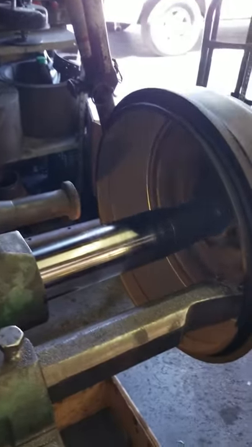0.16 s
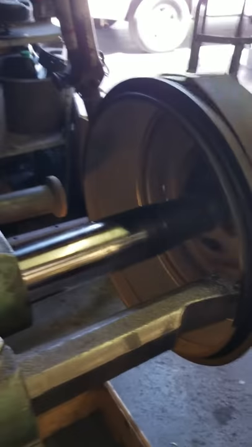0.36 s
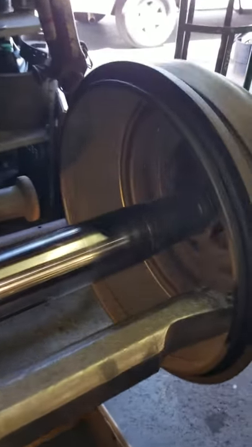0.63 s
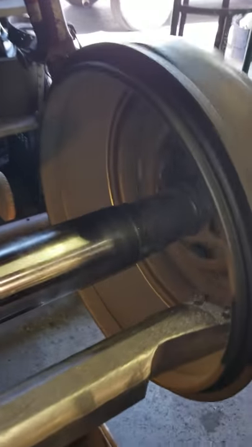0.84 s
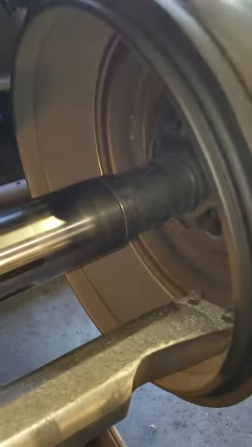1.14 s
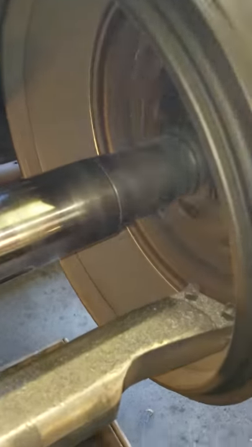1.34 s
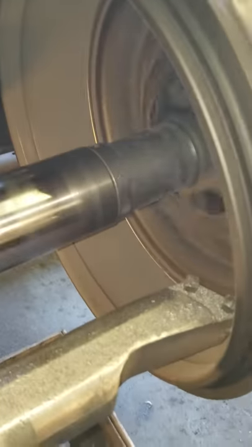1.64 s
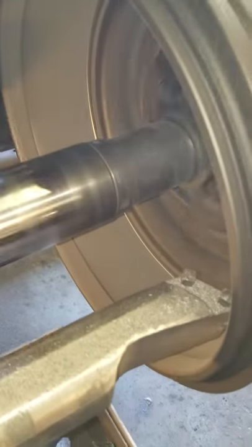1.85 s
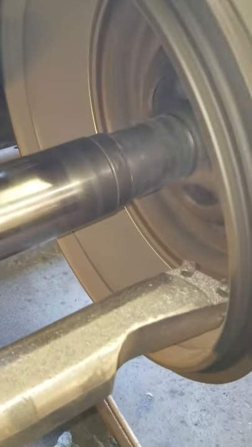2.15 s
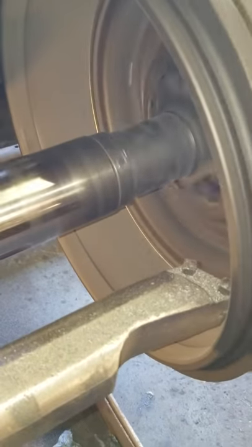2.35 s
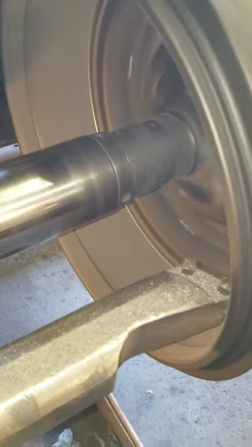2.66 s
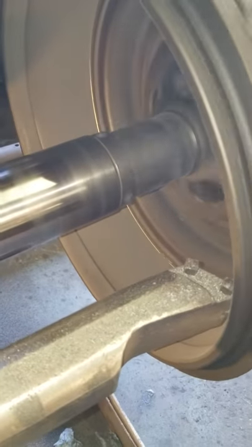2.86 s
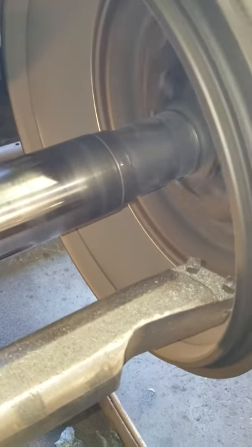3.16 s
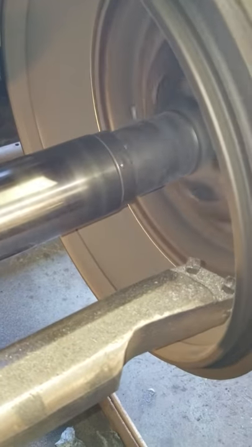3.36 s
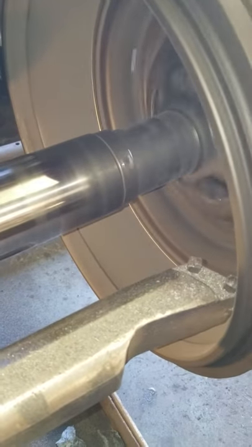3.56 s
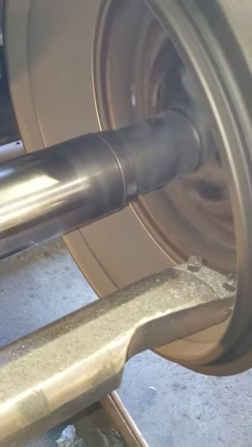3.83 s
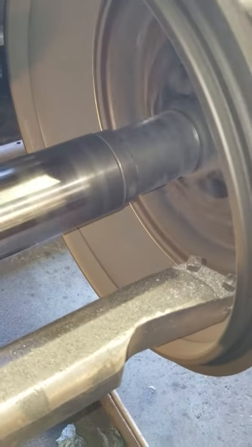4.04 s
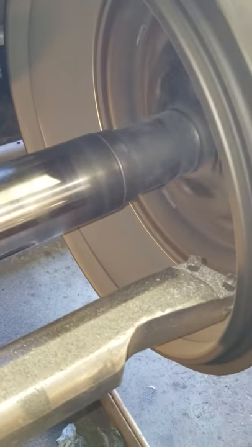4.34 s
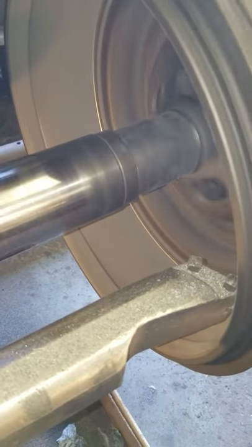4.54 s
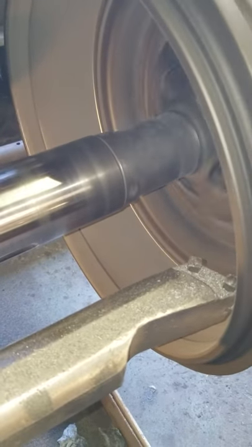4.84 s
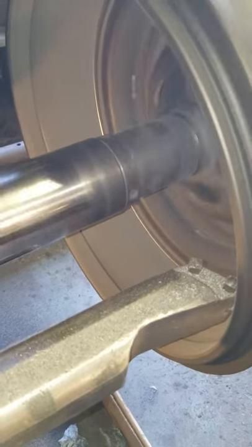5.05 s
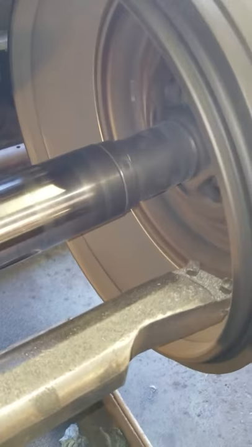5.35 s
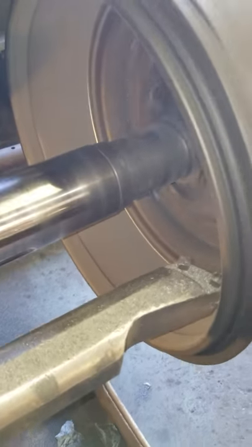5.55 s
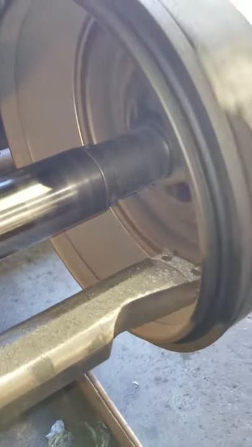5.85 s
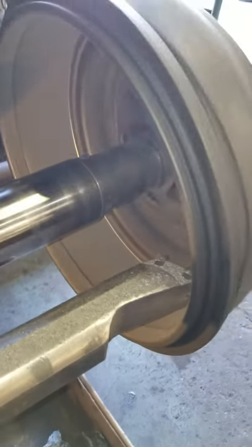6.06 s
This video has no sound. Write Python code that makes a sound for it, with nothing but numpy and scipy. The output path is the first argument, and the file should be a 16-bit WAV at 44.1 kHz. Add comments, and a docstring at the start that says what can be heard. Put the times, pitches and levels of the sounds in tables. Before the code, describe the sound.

Steady metal cutting in a workshop: piercing, fluttering squeal and bright scraping shimmer, brief early rim clangs, and a low machine drone underneath.

```python
"""A harsh metallic shimmer and a high, surging squeal ride over a low hum and rumble: a brake lathe turns a drum.
The hand-held microphone moves in close to the boring bar, then lifts away, which shifts levels and stereo.
Random chip impulses strike resonant modes of drum, bar, tip and clamp; swells make flares and clangs.
Motor tones, a drone, noise bands and randomly shaken resonances form the machine.
The cut alone gets a sliding reflection and scattered workshop echoes; the mix is low-passed."""
import sys
import numpy as np
from scipy import signal
from scipy.io import wavfile
from scipy.ndimage import uniform_filter1d

SR = 44100
rng = np.random.default_rng(int(sys.argv[2]) if len(sys.argv) > 2 else 0)


def unload_wav(signal):
    """Save mono or channel-first audio to the path in sys.argv[1] as 16-bit WAV at rate SR, clipped to [-1, 1]."""
    wavfile.write(
        sys.argv[1],
        SR,
        np.round(np.clip(np.atleast_2d(signal).T, -1, 1) * 32767).astype(np.int16),
    )


N = 273420  # samples, 6.2 s

PORT_COHERENCE = 0.85  # share of a mode's amplitude that both microphone ports hear alike, apart from phase
TURN_HZ = 1.655  # turns of the drum per second


def from_db(db):
    """Decibels become an amplitude factor."""
    return np.exp(np.asarray(db) * (np.log(10) / 20))


def rms_one(x):
    """Scales a signal to rms 1."""
    return x / np.sqrt(np.mean(x ** 2) + 1e-20)


def centre_one(pair):
    """Scales a stereo pair so that its centre has rms 1."""
    return pair / np.sqrt(np.mean(pair.mean(axis=0) ** 2))


def in_time(rows):
    """Draws one curve per column by joining the rows with straight lines."""
    seconds, *columns = np.transpose(rows)
    return [np.interp(np.arange(N) / SR, seconds, column) for column in columns]


def at_hz(points, hz):
    """Reads a spectrum on a log-frequency axis."""
    f, value = np.transpose(points)
    return np.interp(np.log(hz), np.log(f), value)


def drift(rate, size=1):
    """Noise through a two-pole low-pass near rate Hz: smooth chance of rms 1, read at every size-th sample."""
    step = 40  # samples between the drawn points
    pole = np.exp(-2 * np.pi * rate * step / SR)
    noise = rng.standard_normal(N // step + 2002)
    slow = signal.lfilter([1], [1, -2 * pole, pole * pole], noise)[2000:]  # drops the filter's start
    return np.interp(np.arange(0, N, size) / step, np.arange(len(slow)), rms_one(slow))


def swells(rows):
    """Each (crest s, length s, rise dB) row lifts the level in a smooth bell; in dB."""
    out = np.zeros(N)
    for crest_s, length_s, rise_db in rows:
        start = max(int((crest_s - length_s / 2) * SR), 0)
        stop = min(int((crest_s + length_s / 2) * SR), N)
        now = np.arange(start, stop)
        out[now] += rise_db * np.cos(np.pi * (now / SR - crest_s) / length_s) ** 2
    return out


def wavering(pair, share, rate):
    """Bends the pitch at random, by an rms share of it, by reading faster and slower."""
    now, bend = np.arange(N), drift(rate)
    read = now + np.cumsum(share * (bend - bend.mean()))
    return np.array([np.interp(read, now, channel) for channel in pair])


def sustained(pair, hold_s):
    """A steadily driven vibration keeps its size over hold_s and only flutters faster than that."""
    size = int(hold_s * SR)
    power = uniform_filter1d(uniform_filter1d(np.mean(pair ** 2, axis=0), size), size)
    return pair * np.sqrt(np.mean(power) / (power + 1e-12))


def place(pair, pan_db, likeness):
    """Two unrelated signals become left and right with a given balance and likeness."""
    alike = np.clip(likeness, -.99, .99)
    mid = np.sqrt((1 + alike) / 2) * pair[0]
    side = np.sqrt((1 - alike) / 2) * pair[1]
    lean = from_db(pan_db / 2)
    return np.array([(mid + side) * lean, (mid - side) / lean])


def resonate(force, hz, width_hz):
    """Two equal band-pass sections in series ring at one pitch, already sounding at the start; rms 1."""
    r = np.exp(-np.pi * width_hz / SR)
    section = [1 - r, 0, r - 1, 1, -2 * r * np.cos(2 * np.pi * hz / SR), r * r]
    run_in = SR // 20
    led_in = np.hstack([force[:, -run_in:], force]) + 1e-18
    out = signal.sosfilt(np.float32([section, section]), led_in)[:, run_in:]
    return [rms_one(channel) for channel in out]


def microphone_position():
    """The microphone's path as two curves, further back and above; both are near 0 close to the bar."""
    # hand-held path: t/s, further back (0..1), above (0..1)
    path = [(0, 0.93, 0.1), (.5, 0.9, 0.17), (.9, 0.33, 0.25), (1.3, 0.013, 0.018), (5.3, 0.022, 0.018),
            (5.65, 0.29, 0.91), (6.2, 0.28, 0.87)]
    return in_time(path)


def heard(close_db, back_db, above_db):
    """A part's level in dB follows the microphone: its level at the bar plus a change for each direction."""
    back, above = microphone_position()
    return close_db + back * back_db + above * above_db


def beam_db(hz):
    """How much a mode gains while the microphone crosses beams that neighbouring modes radiate."""
    # beams: lowest f/Hz, highest f/Hz, crest t/s, length t/s, rise/dB
    beams = [(9390, 10400, 1.01, 0.6, 6), (9400, 9700, .3, 0.32, 3), (10900, 14000, 1.22, .5, 1),
             (11900, 12100, 1.34, 0.73, 12.5), (12400, 12300, 0.12, .2, 3), (12200, 12700, .58, 0.42, 11),
             (13500, 13750, 1.28, .35, 3), (14100, 16000, 1.13, .4, 4), (5250, 5550, 1.1, 1.5, 6),
             (5850, 6800, 1.44, 0.93, 4), (2300, 2500, 0.38, 0.38, 3), (2800, 4500, 0.83, 0.33, 3),
             (2800, 2950, 0.76, 1.2, 3), (5830, 6100, 5.27, 0.47, 6), (10930, 11300, 5.35, 0.76, 3)]
    return swells([swell for low_hz, high_hz, *swell in beams if low_hz < hz < high_hz])


def from_ports(force, hz, width_hz, pan_db, phase):
    """One mode reaches the two microphone ports with a phase shift, plus a diffuse part."""
    kicks = force * (rng.random((2, N), dtype=np.float32) - .5)  # random sign and strength
    direct, diffuse = resonate(kicks, hz, width_hz)
    quadrature = rms_one(np.gradient(direct))  # a quarter cycle away
    lean = from_db(pan_db / 2)
    in_step = np.float32(PORT_COHERENCE * np.cos(phase) / lean)
    shifted = np.float32(PORT_COHERENCE * np.sin(phase) / lean)
    scattered = np.float32(np.sqrt(1 - PORT_COHERENCE ** 2) / lean)
    left = np.float32(lean) * direct
    right = in_step * direct - shifted * quadrature + scattered * diffuse
    return left, right


def body(modes, force, swell_db, swell_rate, pan_db=0, added_phase=0):
    """Impulses ring every mode; the blend drifts and follows the microphone, at centre rms about 1 before beams."""
    size = 16  # samples per step of the slow gains
    back, above = (curve[::size] for curve in microphone_position())
    sway = np.broadcast_to(added_phase, N)[::size]
    force = np.float32(force)
    out, centre_power = np.zeros((2, N), np.float32), 0
    for hz, width_hz, level_db, lean_db, phase, back_db, above_db in modes:
        mode_db = level_db + back * back_db + above * above_db
        gain = from_db(mode_db + swell_db * drift(swell_rate, size=size))
        beamed = np.repeat(np.float32(gain * from_db(beam_db(hz)[::size])), size)[:N]
        ports = from_ports(force, hz, width_hz, lean_db + pan_db, phase + added_phase)
        for ear, sound in zip(out, ports):
            ear += beamed * sound
        centre_power += gain ** 2 * (1 + PORT_COHERENCE * np.cos(phase + sway)) / 2
    return out / np.repeat(np.sqrt(centre_power), size)[:N]


def chips(per_s, spread_db):
    """Chips snap off at random moments; a positive spread makes a few much stronger, a negative one weaker."""
    sizes = from_db(spread_db * np.minimum(rng.exponential(1, N), 4))
    return sizes * (rng.random(N) < per_s / SR)


def cutting_load(uneven_db, uneven_rate, gear_hz, gear_db):
    """The pressure on the bit varies with the drum's surface and ripples with the gear teeth."""
    gear_speed = gear_hz * (1 + 0.045 * drift(1.3))
    teeth = np.sin(2 * np.pi * np.cumsum(gear_speed) / SR)
    return from_db(uneven_db * drift(uneven_rate) + gear_db * teeth)


def turning(per_turn, crest_s):
    """A wave of height 1 that passes the bit per_turn times in each turn of the drum."""
    return np.cos(2 * np.pi * per_turn * TURN_HZ * (np.arange(N) / SR - crest_s))


def clangs():
    """Coarse chips make the rim clang: its level jumps up and dies away; in dB."""
    # clangs: crest t/s, rise/dB
    strikes = [(.297, 8.5), (0.7, 17.5), (.849, 16.5), (.949, 8), (1.04, 11), (1.174, 8), (1.32, 3.5),
               (1.438, 9), (2.654, 3), (2.791, 6), (3.263, 7.5), (3.588, 4), (3.975, 2), (4.577, 4.5),
               (4.992, 7), (5.178, 6.5), (5.276, 7)]
    attack_s, decay_s = 0.023, 0.016
    t, out = np.arange(N) / SR, np.zeros(N)
    for crest_s, rise_db in strikes:
        since = t - crest_s
        fall = np.where(since < 0, (since / attack_s) ** 2, since / decay_s)
        out += rise_db * np.exp(-np.minimum(fall, 20))
    return out


def drum_rim(load):
    """Chips ring the rim's close modes; a wavy surface makes it throb and the bit's contact bends its pitch."""
    # rim modes: f/Hz, section width/Hz, relative level/dB, left-right/dB, left-right phase/rad,
    # change further back/dB, change above/dB
    rim_modes = [(1584, 34, -35.5, 5, -1.1, 8.5, -3), (1640.6, 63, -35.5, -2.5, -0.91, -5, -5),
                 (1661.7, 27, -37, 4.5, 0.96, 4, -0.5)]
    throb_db = 0.96 * sum(turning(waves, crest_s=0.11) for waves in (4, 5))
    level_db = heard(close_db=-34.5, back_db=-2.7, above_db=-0.75) + throb_db + clangs()
    ringing = body(rim_modes, load * chips(per_s=900, spread_db=3.0), swell_db=0.0, swell_rate=12)
    return from_db(level_db) * wavering(sustained(ringing, hold_s=0.089), share=0.00835, rate=34.6)


def drum_wall():
    """Fine chips keep the wall shimmering; out of round, it rings louder where the cut deepens once a turn."""
    # wall modes: f/Hz, section width/Hz, relative level/dB, left-right/dB, left-right phase/rad,
    # change further back/dB, change above/dB
    wall_modes = [(2147, 280, -45, -1.5, 1.5, 5, -4.5), (2355, 144, -43.5, 2.5, 0.8, 3.5, -2),
                  (2450, 79, -44, 0.5, 2, 7, 8), (2624, 96, -49, -8, 0.5, 6, 5),
                  (2894.6, 101, -31, 5, -2, -1, -1.5), (3015, 390, -33.5, 1, -2.5, 0, 2),
                  (3220, 120, -39, 1, 2.1, 10, -1), (3385, 56, -41, 7.5, 0, 3, -3.5),
                  (3513, 163, -40, -6.5, 0.4, -8, -5.5), (3765, 94, -40, 2, -1.9, -3.5, 2),
                  (3985, 56, -47, -4, -1, 1, 1), (4090, 130, -44, -4, 3, 4, -6),
                  (4323, 110, -34.5, 4, 3, 1.5, -0.5), (4560, 200, -37, -2, 1.67, 1.5, -10),
                  (4903, 280, -38.5, 3, -1, -1, 0), (5050, 80, -42.5, 4.5, 4, 7, 4),
                  (5416, 125, -41, -1, -1.5, 6, 8.5), (5580, 190, -49.5, 6, -1, 5, 10),
                  (5945, 45, -32.5, 1.5, 2, -6, -3), (6090, 350, -36, 5, 1.57, 2, 0.5),
                  (6637, 117, -37, -2, -1.5, 6, -8), (6965, 250, -40, 2, -1.5, 3, 4.5),
                  (7430, 250, -39, 5, -1.2, -1, 0.5), (7593, 160, -34.5, -1.5, -2.5, 7.5, -7),
                  (8450, 460, -43, 6, -2, 5, 1.5)]
    deep_cut_db = 0.5 * turning(1, crest_s=0.57)
    level_db = heard(close_db=-28.5, back_db=1.6, above_db=-0.6) + deep_cut_db
    shimmer = body(wall_modes, chips(per_s=16000, spread_db=-0.2), swell_db=2.8, swell_rate=28)
    return from_db(level_db) * wavering(shimmer, share=.003, rate=29)  # the bit's shifting contact


def cutter(load, stick_db, stick_rate):
    """The bar hisses with the chips; the tip sticks and slips, so tip and clamp squeal in quick surges."""
    # bar, tip and clamp modes: f/Hz, section width/Hz, relative level/dB, left-right/dB,
    # left-right phase/rad, change further back/dB, change above/dB
    bar_modes = [(9370, 660, -35, -6.5, 0.34, -0.5, 0), (9670, 260, -35, -2.5, -1.9, 1, 5.5),
                 (9780, 130, -35, -2, -1.5, 2, -3.5), (10124, 380, -28, -4, -2, -5, 1),
                 (10780, 740, -39.5, 1.5, 3.7, 13.5, 1.0), (11170, 550, -28, -0.5, 0, -13, 2.5),
                 (11570, 90, -43.5, 0, 2.5, -1, -3), (11990, 200, -31.5, 2, 4.5, 4, -0.5),
                 (12370, 230, -26, 1, -2, -8, 4), (12800, 277, -30.5, 1.5, -2.5, 0.5, -11)]
    tip_modes = [(12930, 186, -32, 2.3, 0.2, 1.0, 2), (13010, 46, -29.5, 0.5, 0.84, -1.0, -6),
                 (13112, 210, -27, 0.5, 0.89, -1.5, -2.5)]
    clamp_modes = [(13400, 170, -27, 0, 1.5, -4, 1), (13600, 180, -34, 1, 0, 0, 4),
                   (13870, 180, -28.5, 2, 2.2, 5, -1), (13925, 70, -29.5, -2, -1.5, 6, -4),
                   (14170, 170, -31.5, -1, 1, -1, -6), (14960, 450, -37.5, 1.5, 0.4, -2, 0),
                   (15550, 450, -42.5, -0.5, 0, -3, -4)]
    # strength of the chatter between flares: t/s, tip level/dB, clamp level/dB
    chatter = [(0, -23.5, -22), (.45, -29.5, -22.5), (.8, -26.5, -29), (1.2, -27.5, -27),
               (1.7, -26.5, -28.5), (2.4, -21.5, -25), (3.2, -21.5, -28.5), (4.2, -22.5, -26.5),
               (5.05, -27, -27.5), (5.45, -26, -26), (5.85, -27, -29), (6.2, -23, -29)]
    # the tip digs in and its squeal flares: crest t/s, length t/s, rise/dB
    flares = [(.11, 0.14, 5), (.72, 0.18, 10.5), (.93, 0.15, 5.5), (1.29, 0.26, 9), (2.42, .3, 1.5),
              (5.35, 0.28, 7)]
    # the microphone drifts through the squeal's standing waves: t/s, added left-right/dB, added phase/rad
    standing_waves = [(0, -3, 1.5), (.25, 2, 0.45), (.55, -3, 1.7), (.72, 1, 0.083), (1.05, 0, 1.2),
                      (1.3, 1, -0.13), (1.65, 1, 1), (2.2, 0, -1.2), (2.8, 0, 0.7), (4.2, 0.5, 0.028),
                      (5.1, 0, 0.66), (5.3, -2, 0.03), (5.5, -3, 1.6), (5.9, .8, 0.68), (6.2, 0, 0.47)]
    tip_db, clamp_db = in_time(chatter)
    flare_db = swells(flares)
    pan_db, added_phase = in_time(standing_waves)

    force = load * chips(per_s=19000, spread_db=-1.2)
    surging = force * from_db(stick_db * np.tanh(drift(stick_rate)))
    bar_db = heard(close_db=-28, back_db=-1.8, above_db=0) + 0.1 * flare_db  # follows a tenth of a flare
    bar = from_db(bar_db) * body(bar_modes, force, swell_db=1.3, swell_rate=19)
    tip = body(tip_modes, surging, swell_db=2.2, swell_rate=14, pan_db=pan_db, added_phase=added_phase)
    tip = from_db(tip_db + flare_db) * tip
    clamp = body(clamp_modes, surging, swell_db=2.3, swell_rate=12)
    clamp = from_db(clamp_db + 0.16 * flare_db) * clamp
    return bar + tip + clamp


def tone(hz, wander):
    """A sine of rms 1 whose pitch wanders slightly and smoothly."""
    cycles = np.cumsum(hz * (1 + wander * drift(3.66))) / SR
    return np.sqrt(2) * np.sin(2 * np.pi * (cycles + rng.random()))


def motor_hum():
    """The motor hums as a few tones of steady level, each wandering on its own."""
    # motor tones: f/Hz, rms level/dB
    motor_tones = [(59.8, -62), (120, -68), (134, -57), (209.5, -46), (715, -54)]
    return sum(from_db(level_db) * tone(hz, wander=0.0026) for hz, level_db in motor_tones)


def drive_drone():
    """The drive drones on one wandering pitch that swells, fades and flutters, stronger on the left."""
    # drone swells: crest t/s, length t/s, rise/dB
    drone_swells = [(.07, 0.51, 15.5), (.62, 0.34, 7.5), (.99, 0.31, 13), (2.15, 0.23, 8), (2.7, 0.78, 5.5),
                    (4.6, 1.0, 5.5)]
    level_db = -44 + swells(drone_swells) + 2.6 * drift(4.8)
    left_right_db = [[2.2], [-3]]
    return from_db(level_db) * tone(269.3, wander=0.0086) * from_db(left_right_db)


def rumble(patchy_db):
    """Bearing and gear noise in half-octave bands, each flickering a little; centre rms 1."""
    # rumble spectrum: f/Hz, relative level/dB per Hz
    spectrum = [(20, -26), (45, -23), (72, -11.5), (95, -9.5), (150, -3.5), (200, -7.5), (260, -2.5),
                (350, -0.5), (480, -13), (600, -10), (800, -13.5), (1050, -12.5), (1380, -9.5), (1900, -23)]
    # left-right likeness of the rumble: f/Hz, likeness (-1..1)
    likeness = [(30, .94), (70, 1), (130, 0.9), (260, 0.85), (500, 0.5), (1000, 0.041), (2000, 0.09)]
    out = np.zeros((2, N))
    edges = 20 * 2 ** (np.arange(14) / 2)
    for low, high in zip(edges, edges[1:]):
        band_pass = signal.butter(2, [low, high], "band", fs=SR, output="sos")
        band = signal.sosfilt(band_pass, rng.standard_normal((2, N)))
        hz = np.sqrt(low * high)
        level_db = at_hz(spectrum, hz) + patchy_db * drift(15.0)
        out += from_db(level_db) * place(band, 0.85, at_hz(likeness, hz))
    return centre_one(out)


def shaken(modes):
    """Resonances kept ringing by steady random shaking; centre rms 1."""
    out = np.zeros((2, N))
    for hz, width_hz, level_db, pan_db, likeness in modes:
        ringing = resonate(rng.standard_normal((2, N)), hz, width_hz)
        out += from_db(level_db) * place(ringing, pan_db, likeness)
    return centre_one(out)


def gearbox():
    """Two resonances ring steadily; each ring's level swells briefly now and then."""
    # gearbox resonances: f/Hz, section width/Hz, level/dB, left-right/dB, left-right likeness (-1..1)
    gear_modes = [(668.4, 44, -46, 0.59, 0.63), (867, 49, -47, 3.5, 0.22)]
    # ring swells: crest t/s, length t/s, rise of the lower ring/dB, rise of the upper ring/dB
    ring_swells = np.array([(1.24, 0.11, 16, 4), (1.46, .12, 3, 13.5), (2.822, 0.14, 12, 6)])
    out = np.zeros((2, N))
    for k, mode in enumerate(gear_modes):
        level_db = mode[2] + swells(ring_swells[:, [0, 1, 2 + k]])
        out += from_db(level_db) * sustained(shaken([mode]), hold_s=0.45)
    return out


def machine():
    """Motor and drive shake the frame and housing: hums and one drone sound over the rumble."""
    # how strongly the machine shakes: t/s, rumble level/dB, frame level/dB
    shaking = [(0, -31, -53), (.35, -32, -34.5), (1, -32, -46), (1.6, -34, -40.5), (2.4, -33, -47.5),
               (3.1, -33, -40), (4.4, -33.5, -60), (5.3, -34.5, -48), (6.2, -34.5, -36)]
    # frame and housing: f/Hz, section width/Hz, relative level/dB, left-right/dB, left-right likeness (-1..1)
    frame_modes = [(105.4, 13, -43, 0.5, 0.99), (131.4, 14.5, -45, 2.5, 1)]
    housing_modes = [(167.3, 4.6, -49.5, 1, 0.78), (336.2, 33, -45, 1, 1), (414.3, 20, -47.5, 1, 0.85)]
    rumble_db, frame_db = in_time(shaking)
    low_noise = from_db(rumble_db) * rumble(patchy_db=2.0)
    frame = from_db(frame_db) * sustained(shaken(frame_modes), hold_s=0.15)
    housing = from_db(-41) * shaken(housing_modes)
    return low_noise + frame + housing + gearbox() + motor_hum() + drive_drone()


def drum_echo(x, near_s, travel_s):
    """Away from the bar the drum's face adds a reflection whose delay slides as the microphone moves."""
    away, now = sum(microphone_position()), np.arange(N)
    gain = .5 * np.minimum(3 * away, 1)
    lag = (near_s + travel_s * away) * SR  # samples
    detours = (1, 1.04)  # the right ear's path is longer
    echo = [np.interp(now - lag * detour, now, channel, left=0) for channel, detour in zip(x, detours)]
    return (x + gain * np.array(echo)) / np.sqrt(1 + gain ** 2)


def workshop(x, wet_db, t60, count=40):
    """Scattered reflections from machine, shelves and walls differ per ear; the unsteady hand bends their pitch."""
    delays_s = rng.uniform(.008, .12, (2, count))
    response = np.zeros((2, SR // 8))
    for ear, late_s in zip(response, delays_s):
        ear[(late_s * SR).astype(int)] = rng.choice([-1, 1], count) * from_db(-60 * late_s / t60)
    response *= from_db(wet_db) / np.linalg.norm(response, axis=1, keepdims=True)
    reflections = signal.oaconvolve(x, response, axes=1)[:, :N]
    reflections = wavering(reflections, share=.0015, rate=2.483)
    return (x + reflections) / np.hypot(1, from_db(wet_db))


def scene():
    """The cut drives the drum and the cutter, over the running machine."""
    load = cutting_load(uneven_db=1.0, uneven_rate=44, gear_hz=44.6, gear_db=0.3)
    cut = drum_rim(load) + drum_wall() + cutter(load, stick_db=1.0, stick_rate=91)
    cut = drum_echo(cut, near_s=.0012, travel_s=0.0004915)
    return workshop(cut, wet_db=-8.5, t60=0.27) + machine()


def record(dry):
    """A steep elliptic low-pass cuts the top above 15750 Hz."""
    low_pass = signal.ellip(12, .1, 80, 15750, fs=SR, output="sos")  # order, ripple dB, stop-band dB, Hz
    return signal.sosfilt(low_pass, dry)


dry = scene()
out = record(dry)
unload_wav(out)
```